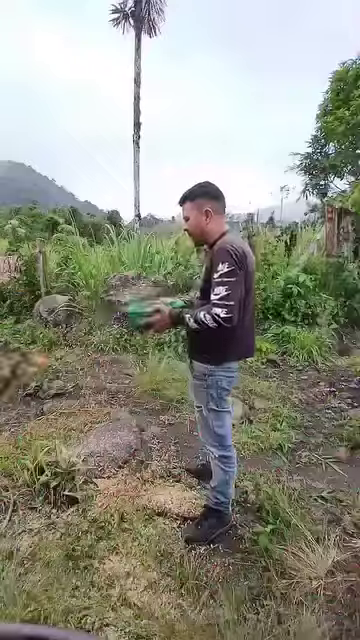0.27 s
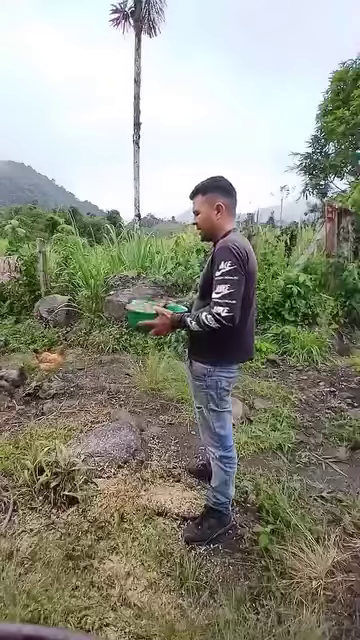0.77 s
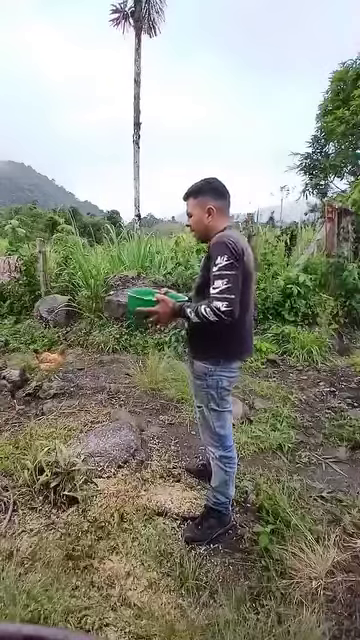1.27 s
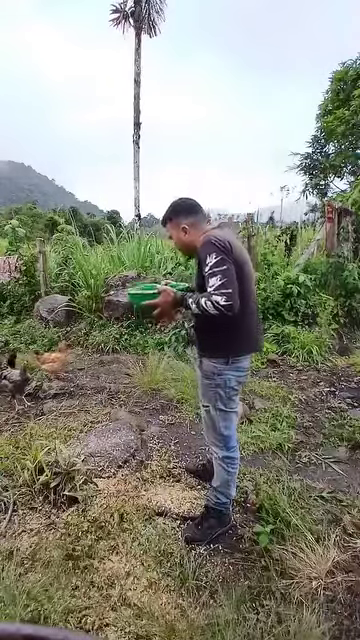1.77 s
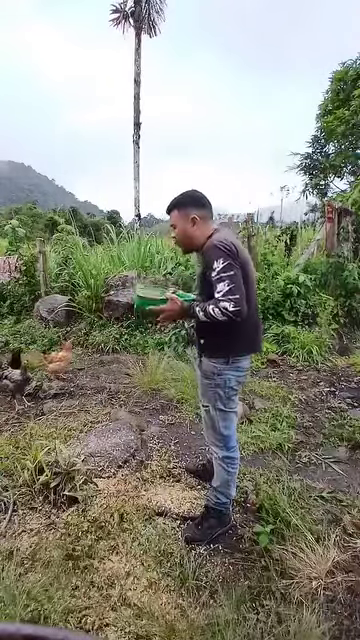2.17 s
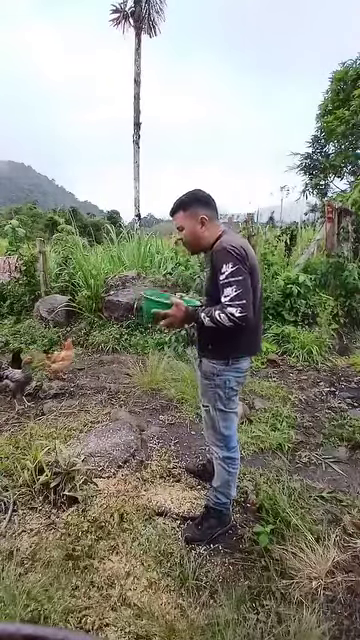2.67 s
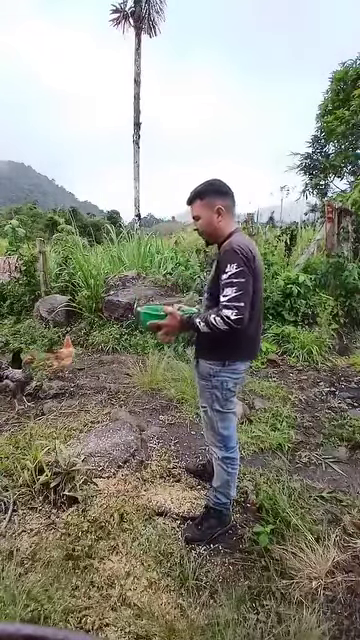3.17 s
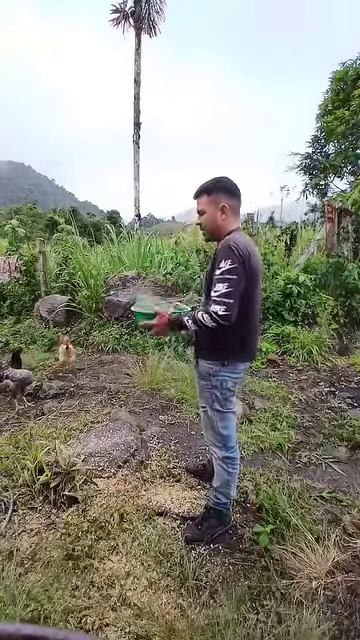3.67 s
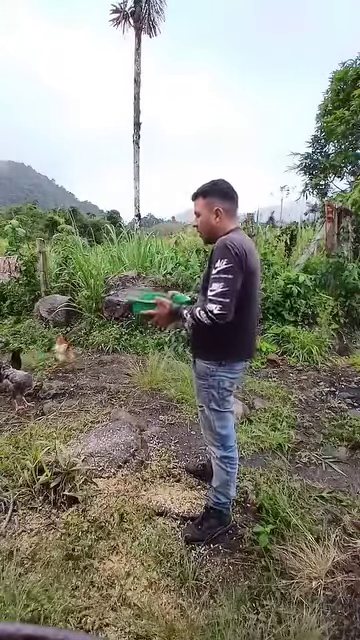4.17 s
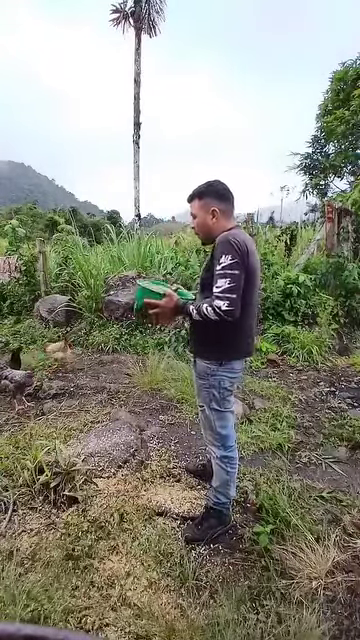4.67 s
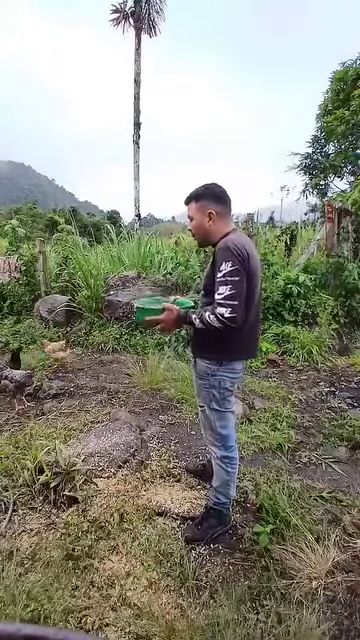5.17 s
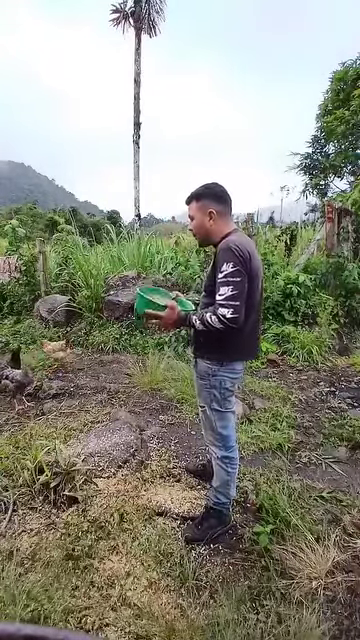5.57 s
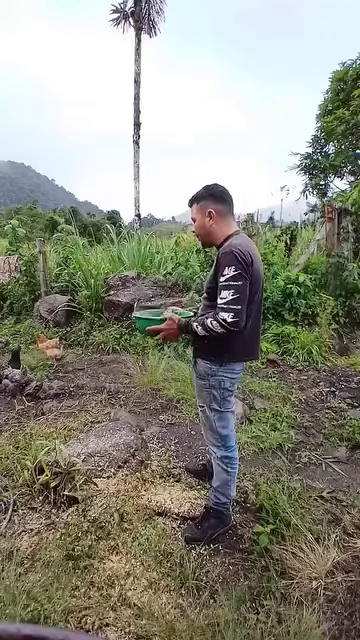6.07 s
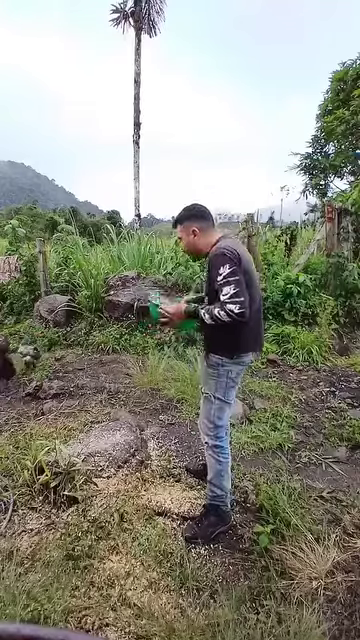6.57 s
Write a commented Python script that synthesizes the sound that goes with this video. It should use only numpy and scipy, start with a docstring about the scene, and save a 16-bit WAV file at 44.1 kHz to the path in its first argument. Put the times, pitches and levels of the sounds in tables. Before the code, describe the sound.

Coffee beans are tossed in a plastic bowl outdoors, landing with hollow thuds and rattling showers about three times a second.

```python
"""A hollow thud and a rattling shower, about three times a second: hulled coffee beans being winnowed
in a plastic bowl, outdoors, a few steps away. Each load drums on the bottom, rising in pitch as the
bowl fills, and the stragglers rain onto the heap and the wall. Between tosses the beans slide and tick.
Hens and the open country murmur behind."""
import sys
import numpy as np
from scipy import signal
from scipy.fft import rfft, irfft, next_fast_len
from scipy.io import wavfile
from scipy.ndimage import uniform_filter1d

SR = 44100
rng = np.random.default_rng(int(sys.argv[2]) if len(sys.argv) > 2 else 0)


def persist_wave(psi):
    """Save psi, clipped to +-1, as 16-bit WAV."""
    counts = np.round(np.clip(psi, -1, 1) * 32767).astype(np.int16)
    wavfile.write(sys.argv[1], SR, np.atleast_2d(counts).T)


N = 300321
TIME = np.arange(N) / SR
FFT_SIZE = 2 * next_fast_len(N // 2 + 4096)
FREQ = np.maximum(np.arange(FFT_SIZE // 2 + 1) * SR / FFT_SIZE, 1)

# The load comes down in the bowl. Each row: landing time in seconds, relative thud level in dB,
# bowl pitch in Hz, relative shower crest in dB, shower build-up in dB, scatter until the last beans
# land in seconds, relative level of the sliding afterwards in dB.
LANDINGS = [(0.059, -23.5, 660, -26.5, 3.5, 0.057, -62.5), (0.473, -23, 696, -28.5, 1, 0.066, -56),
            (0.802, -25, 642, -27, 5.0, 0.037, -70), (1.093, -26.5, 784, -29, 5.5, 0.031, -61.5),
            (1.399, -24.1, 740, -30, -2, 0.031, -67), (1.681, -34.5, 854.4, -40.5, 1.5, 0.014, -54.5),
            (1.965, -22, 780, -28, 2.5, 0.03, -56.5), (2.213, -27, 804, -25.5, 9, 0.027, -63.0),
            (2.493, -24.5, 791.0, -25, 7.0, 0.034, -57.5), (2.768, -24, 735, -24.5, 8, 0.038, -58),
            (3.047, -21, 750, -26, 6, 0.042, -57.5), (3.355, -23.5, 658, -28, 0.5, 0.047, -69),
            (3.693, -20.5, 725.0, -28.5, 1, 0.053, -65.5), (4.05, -21.5, 687, -28.5, 3, 0.062, -75),
            (4.396, -20.5, 700, -28, 0.5, 0.058, -53.5), (4.744, -20.5, 780, -30.5, 1, 0.056, -49),
            (5.051, -23, 640, -27.5, 4.5, 0.054, -48.5), (5.369, -23.5, 740, -27.5, 5, 0.054, -57.5),
            (5.692, -20.5, 800, -25.5, 2.5, 0.053, -52.5), (6.023, -23, 730, -28.5, -0.5, 0.052, -54),
            (6.318, -28.5, 850, -25, 5.5, 0.019, -55.5), (6.607, -20.5, 777, -24, 3.5, 0.048, -46.5)]
USUAL_SCATTER_S = 0.04   # a higher toss scatters the load for longer, so it swells more slowly


def thuds(width_hz=230, trim_db=0.28):
    """The load drums on the bottom of the bowl; the pitch climbs into each landing."""
    # The load weighs the bottom down, then lets it go.
    # Each row: time from the landing in seconds, multiple of the bowl pitch.
    glide = [(-.11, .99), (-.065, 1.5), (-.036, 0.52), (-.016, 0.76), (0, .98), (.018, 0.96), (.06, 0.98),
             (.11, 0.73)]
    # The hollow tone of the bottom. Each row: frequency in Hz, relative level in dB.
    bottom_tone = [(30, -45.5), (100, -22.5), (175, -17.5), (240, -20.5), (310, -12.5), (385, -16),
                   (470, 0), (650, 3.5), (900, -2), (1250, -6.5), (2500, -21.5), (6000, -33.5)]
    # The load rolls as the grip shifts. Each row: time in seconds, relative level in dB.
    roll = [(1.65, -85), (1.71, -47.5), (1.77, -43), (1.84, -51.5), (1.88, -41), (1.94, -65), (1.99, -85)]
    since, pitch = nearest_landing()
    centre_hz = pitch * np.interp(since, *np.transpose(glide))
    drum = moving_resonance(impacts(per_s=4000, spread_db=2.5), centre_hz, width_hz)
    drum = evened(in_bowl(drum, bottom_tone), span_s=0.012)
    rolling = from_db(np.interp(TIME, *np.transpose(roll)))
    return from_db(trim_db) * drum * np.sqrt(thud_power() + rolling ** 2)


def thud_power(hold_s=0.0078):
    """Each landing swells, holds and dies; a compact load gives a short knock."""
    power = 0
    for start, db, _, _, _, scatter_s, _ in LANDINGS:
        stretch = scatter_s / USUAL_SCATTER_S
        power += swell(start, start + hold_s, db, db, 0.12 * stretch ** 0.37, 0.096 * stretch)
    return power


def showers(thinnest_per_s=7000, extra_per_s=14000, trim_db=1.11, wall_share=0.2, wall_delay_s=0.017):
    """Beans rain on the heap, then spill against the wall, which rings brighter."""
    # The tone of beans landing on beans. Each row: frequency in Hz, relative level in dB.
    heap_tone = [(30, -48), (130, -18), (250, -19.5), (450, -5), (800, 3), (1250, -7.5), (1700, -1.5),
                 (2150, -8), (2500, 1), (3100, -4), (3800, -6), (5400, -12.5), (6500, -16), (7700, -23),
                 (9600, -26)]
    level = np.sqrt(shower_power())
    per_s = thinnest_per_s + extra_per_s * level / level.max()
    heap = in_bowl(clatter(per_s, spread_db=1.0, cycles=38, ring_db=-0.5), heap_tone)
    wall = on_wall(clatter(per_s=1500, spread_db=1.5, cycles=77, ring_db=10.5))
    since, _ = nearest_landing()
    share = wall_share * np.clip(since / wall_delay_s, 0.1, 1)
    blend = np.sqrt(1 - share) * heap + np.sqrt(share) * wall
    return from_db(trim_db) * level * evened(blend, span_s=0.014)


def shower_power(lead_share=0.31, fringe_db=-13):
    """A shower starts just ahead of its thud and stops short; a thin fringe comes early and stays late."""
    power = 0
    for landing, _, _, crest_db, build_db, scatter_s, _ in LANDINGS:
        rise_s = 0.12 * (scatter_s / USUAL_SCATTER_S) ** 0.65
        core = (landing - lead_share * scatter_s, landing + scatter_s, crest_db - build_db, crest_db)
        power += swell(*core, rise_s, fall_s=0.16)
        power += from_db(fringe_db) ** 2 * swell(*core, rise_s=0.18, fall_s=0.32)
    return power


def sliding(trim_db=0.2, surge_db=2.8):
    """Loose beans and husks roll against one another in small surges."""
    # The rustle of the shifting heap. Each row: frequency in Hz, relative level in dB.
    rustle_tone = [(30, -38), (150, -25.5), (450, -4.5), (800, 2.5), (1250, -9.5), (1700, 0.5),
                   (2600, -0.5), (4000, -3), (5400, -12.5), (7000, -16.5), (9600, -20)]
    grains = clatter(per_s=6000, spread_db=2.0, cycles=31, ring_db=0.0)
    level = np.sqrt(slide_power()) * from_db(trim_db + surge_db * drift(per_s=36))
    return level * evened(in_bowl(grains, rustle_tone), span_s=0.15)


def slide_power(settle_db_per_s=16):
    """The heap settles after each landing and now and then spills."""
    # The bowl tips and part of the heap runs down.
    # Each row: start in seconds, length in seconds, relative level in dB.
    spills = [(1.831, 0.023, -54), (3.253, .04, -56), (4.527, 0.028, -43.5), (5.884, 0.046, -54),
              (6.717, 0.11, -41)]
    when, *_, slide_db = np.transpose(LANDINGS)
    last = np.maximum(np.searchsorted(when, TIME) - 1, 0)
    since = np.abs(TIME - when[last])
    power = from_db(slide_db[last] - settle_db_per_s * (since - 0.1)) ** 2
    for start, length, db in spills:
        power += swell(start, start + length, db, db, rise_s=0.16, fall_s=0.063)
    return power


def loose_beans(trim_db=-9):
    """Single beans hop on the settling heap and tick against the wall."""
    ticks = on_wall(clatter(per_s=90, spread_db=3.5, cycles=25, ring_db=2))
    return from_db(trim_db) * np.sqrt(slide_power()) * ticks


def strays(trim_db=-8.5, clump_s=0.011, fade_db=-6, count=8):
    """A few late beans strike the wall in quick succession, each waking the modes differently."""
    # Small clumps hit the wall or rim. Each row: start in seconds, relative strength in dB.
    clumps = [(0.1062, -21), (0.6506, -41), (1.289, -39.5), (1.8184, -45), (2.804, -18), (2.9366, -42.5),
              (3.0756, -13.5), (3.4628, -36.5), (3.7477, -19), (3.7974, -38), (4.4466, -24),
              (4.6121, -41.5), (4.7788, -17), (5.1, -22.5), (5.206, -43), (5.4121, -14.5), (5.9244, -42),
              (6.3262, -19), (6.704, -25.5), (6.7388, -27.5), (6.7695, -30)]
    # The tick of a bean on the wall. Each row: frequency in Hz, relative level in dB, t60 in seconds.
    wall_modes = [(1720, -9.5, .014), (2466, 1, 0.021), (2980, 4, 0.011), (3724, 3, 0.0075),
                  (5420, -5, 0.0074), (8200, -16.5, 0.0043)]
    when, clump_db = np.transpose(clumps)
    lateness = (np.arange(count) + rng.random((len(when), count))) / count
    hits = np.minimum((when[:, None] + clump_s * lateness) * SR, N - 1).astype(int)
    out = np.zeros((2, N))
    for hz, mode_db, t60 in wall_modes:
        clicks = np.zeros((2, N))
        strength = from_db(clump_db[:, None] + mode_db + trim_db + fade_db * lateness)
        clicks[:, hits] = strength * rng.standard_normal((len(when), 2, count)).swapaxes(0, 1)
        out += ring(clicks, hz, t60)
    # the clumps carry nothing below about 600 Hz
    return signal.sosfilt(signal.butter(2, 600, "high", fs=SR, output="sos"), out)


def bumps():
    """The loaded bowl is jolted in the hands and gives one short, low note."""
    # Dull bumps of the whole bowl. Each row: time in seconds, peak level in dB.
    jolts = [(3.7, -49.5), (4.778, -53), (6.319, -41), (6.611, -50)]
    when, peak_db = np.transpose(jolts)
    clicks = np.zeros(N)
    clicks[(when * SR).astype(int)] = from_db(peak_db)
    return ring(clicks, hz=150, t60=0.043)


def hens(octave_db=-2, waver=0.016):
    """Hens murmur across the yard: soft, unsteady falling moans, a fundamental and its octave."""
    # Each row is one moan: start and end in seconds, first and last pitch in Hz, level in dB.
    moans = [(1.708, 1.784, 337, 323, -55), (1.75, 1.87, 385, 351, -56.5), (5.75, 5.915, 369, 309, -57)]
    out = np.zeros(N)
    for start, end, first_hz, last_hz, db in moans:
        along = np.clip((TIME - start) / (end - start), 0, 1)
        hz = (first_hz + (last_hz - first_hz) * along) * (1 + waver * drift(per_s=60))
        phase = 2 * np.pi * np.cumsum(hz) / SR
        voice = np.sin(phase) + from_db(octave_db) * np.sin(2 * phase)
        out += from_db(db) * np.sin(np.pi * along) * voice
    return np.array([out, np.zeros(N)])   # on the shared path only


def country(level_db=-54.5):
    """The far wash of the valley over a low rumble."""
    # The tone of the open air. Each row: frequency in Hz, relative level in dB.
    valley_tone = [(20, -35.5), (35, -24.5), (52, -16), (78, -3), (115, -14), (230, -16.5), (400, -12),
                   (640, -7.5), (830, 3.5), (1020, -9), (1300, -17.5), (2700, -28), (5000, -31.5),
                   (9500, -33)]
    return from_db(level_db) * colour(rng.standard_normal((2, N)), per_hz(valley_tone))


def in_bowl(x, tone, depth=1.275):
    """Give a sound its own tone plus the peaks and dips of the bowl; rms 1."""
    # Resonances of the loaded bowl. Each row: centre in Hz, width in Hz, lift in dB at depth 1.
    resonances = [(562.3, 29, 1), (626, 94, -7.5), (760, 53, 0.5), (872, 81, 5), (980, 43, -9),
                  (1015, 57, 4), (1400, 37, 3.5), (2138, 39, 5), (2294, 60, 9.5), (2474, 36, 1),
                  (2887, 42, -2.5), (3040, 56, 3.5), (3080, 44, -0.5), (3490, 45, 1.5), (4864, 70, -11.5),
                  (4920, 89, 8), (5450, 77, 6.5), (5790, 72, -6.5)]
    lift_db = sum(db / (1 + (2 * (FREQ - hz) / width) ** 2) for hz, width, db in resonances)
    return colour(x, per_hz(tone) + depth * lift_db)


def on_wall(x):
    """The plastic wall gives contacts a bright, thin edge."""
    # The tone of the wall. Each row: frequency in Hz, relative level in dB.
    wall_tone = [(100, -52), (1000, -33), (2000, -13.5), (2400, -2), (3200, -1.5), (3900, -10),
                 (6000, -21.5), (9000, -35)]
    return in_bowl(x, wall_tone)


def echoed(paths, sway=0.065):
    """The bowl moves, so its short echoes colour every toss a little differently."""
    # Echoes off the bowl wall, the body and the ground, one list for each path.
    # Each pair: mean delay in seconds, gain against the direct sound.
    reflections = [
        [(.0030, 0.57), (0.001612, .25)],
        [(.0011, 0.27), (.0020, 0.34)],
    ]
    out = paths.copy()
    for k, echoes in enumerate(reflections):
        for delay, gain in echoes:
            swaying_delay = delay * (1 + sway * drift(per_s=4))
            out[k] += gain * np.interp(TIME - swaying_delay, TIME, paths[k])
        out[k] /= np.sqrt(1 + sum(gain ** 2 for _, gain in echoes))
    return out


def stereo_image(paths):
    """A shared and an opposed path reach two microphone ports: alike in the bass, wide in the treble."""
    # The low mids lean right. Each row: frequency in Hz, left minus right in dB.
    balance = [(80, -3), (300, -5.5), (440, -1.2), (560, -4.5), (680, -12), (820, -19.5), (1020, -8.5),
               (1300, 0), (1900, 3), (2500, -0.3), (3300, 2.1), (5000, 1), (9000, 0.8)]
    # How alike the two ports sound. Each row: frequency in Hz, likeness from 0 to 1.
    likeness = [(60, 0.86), (300, 0.71), (520, 0.98), (750, 0.84), (1100, 0.69), (1600, 0.37), (2200, 0.19),
                (3000, 0.57), (4200, 0.088), (9000, 0.24)]
    # The left port hears later. Each row: frequency in Hz, phase lag in radians.
    left_lag = [(100, 0), (720, 0.25), (930, 2), (1200, 3.5), (2200, 3), (2600, 4.5), (3100, 6),
                (4000, 9.5), (9000, 19.5)]
    shared, opposed = rfft(paths, FFT_SIZE)
    alike = np.clip(per_hz(likeness), 0, 1)
    shared *= np.sqrt(1 + alike)
    opposed *= np.sqrt(1 - alike)
    tilt = from_db(per_hz(balance))
    left = (shared + opposed) * tilt * np.exp(-1j * per_hz(left_lag))
    right = shared - opposed
    return irfft(np.array([left, right]) / np.sqrt(1 + tilt ** 2))[:, :N]


def clatter(per_s, spread_db, cycles, ring_db, count=48):
    """Every contact is a snap and a ring at that bean's pitch, 60 dB down after the given cycles."""
    clicks = impacts(per_s, spread_db)
    bean = rng.integers(0, count, N)
    pitches = np.geomspace(1300, 9800, count)
    rings = sum(ring(clicks * (bean == k), hz, cycles / hz) * hz for k, hz in enumerate(pitches))
    return rms_one(clicks) + from_db(ring_db) * rms_one(rings)


def impacts(per_s, spread_db):
    """Random contacts, mostly small and a few large, each with its own strength along two paths."""
    sizes = from_db(spread_db * np.minimum(rng.exponential(1, N), 4))
    struck = rng.random(N) < per_s / SR
    return struck * sizes * rng.standard_normal((2, N)) / np.sqrt(per_s)


def ring(clicks, hz, t60):
    """A unit click sets a sine of height 1 ringing."""
    radius = from_db(-60 / (t60 * SR))
    angle = 2 * np.pi * hz / SR
    poles = [1, -2 * radius * np.cos(angle), radius ** 2]
    return signal.lfilter([0, np.sin(angle)], poles, clicks + 1e-18)


def moving_resonance(x, hz, width_hz, block=64):
    """A band-pass whose centre moves, stepped in short blocks."""
    radius = np.exp(-np.pi * width_hz / SR)
    out, state = np.zeros_like(x), np.zeros((2, 2))
    for i in range(0, N, block):
        poles = [1, -2 * radius * np.cos(2 * np.pi * hz[i] / SR), radius ** 2]
        out[:, i:i + block], state = signal.lfilter([1, 0, -1], poles, x[:, i:i + block], zi=state)
    return out


def colour(x, gain_db):
    """Shape the tone with a causal (minimum-phase) filter; rms 1."""
    cepstrum = irfft(np.log(from_db(gain_db)))
    cepstrum[1:FFT_SIZE // 2] *= 2
    cepstrum[FFT_SIZE // 2 + 1:] = 0
    response = np.exp(rfft(cepstrum))
    return rms_one(irfft(rfft(x, FFT_SIZE) * response)[..., :N])


def nearest_landing():
    """Seconds from the nearest landing, and the bowl pitch of that landing."""
    when, _, pitch, *_ = np.transpose(LANDINGS)
    nearest = np.searchsorted((when[1:] + when[:-1]) / 2, TIME)
    return TIME - when[nearest], pitch[nearest]


def swell(start, end, first_db, last_db, rise_s, fall_s):
    """Power that grows, holds along a slope and dies away; rise and fall times span 60 dB."""
    outside = np.maximum(start - TIME, 0) / rise_s + np.maximum(TIME - end, 0) / fall_s
    held_db = np.interp(TIME, [start, end], [first_db, last_db])
    return from_db(held_db - 60 * np.minimum(outside, 3)) ** 2


def evened(x, span_s):
    """Hold the level steady over a short span, leaving the finer grain."""
    power = uniform_filter1d(np.mean(x ** 2, axis=0), int(span_s * SR) + 1)
    power = uniform_filter1d(power, int(span_s * SR / 2) + 1)
    return x / np.sqrt(np.maximum(power, 1e-6))


def drift(per_s):
    """A random wander with a spread of about 1."""
    knots = np.arange(0, N / SR + 1, 1 / per_s)
    return np.interp(TIME, knots, rng.standard_normal(len(knots)))


def per_hz(points):
    """Join (Hz, value) rows on a log-frequency axis."""
    hz, value = np.transpose(points)
    return np.interp(np.log(FREQ), np.log(hz), value)


def from_db(db):
    """Decibels to gain."""
    return 10 ** (np.asarray(db) / 20)


def rms_one(x):
    """Scale to unit rms."""
    return x / np.sqrt(np.mean(x ** 2) + 1e-20)


def scene():
    """The bowl and its beans in front, the hens and the valley behind."""
    beans = echoed(showers() + sliding() + loose_beans() + strays())
    return stereo_image(thuds() + beans + hens() + country()) + bumps()


def record(dry):
    """The treble is cut steeply above 10 kHz."""
    return signal.sosfilt(signal.ellip(12, 0.2, 90, 10000, fs=SR, output="sos"), dry)


dry = scene()
out = record(dry)
persist_wave(out)
```